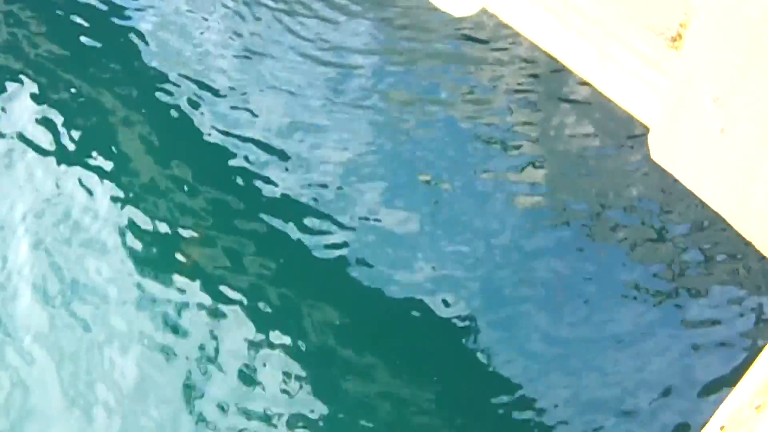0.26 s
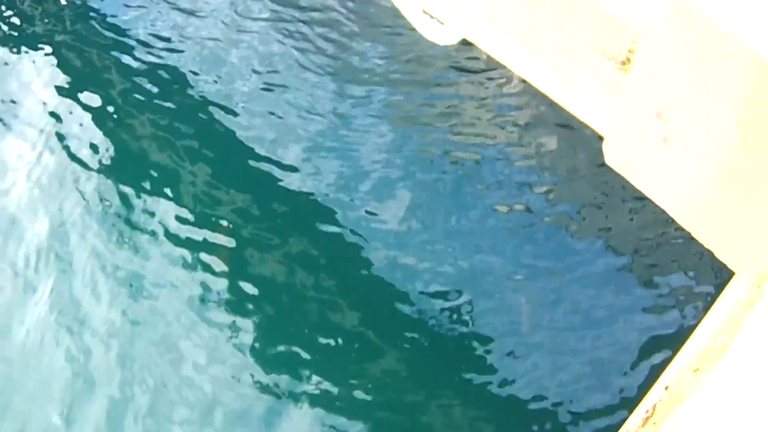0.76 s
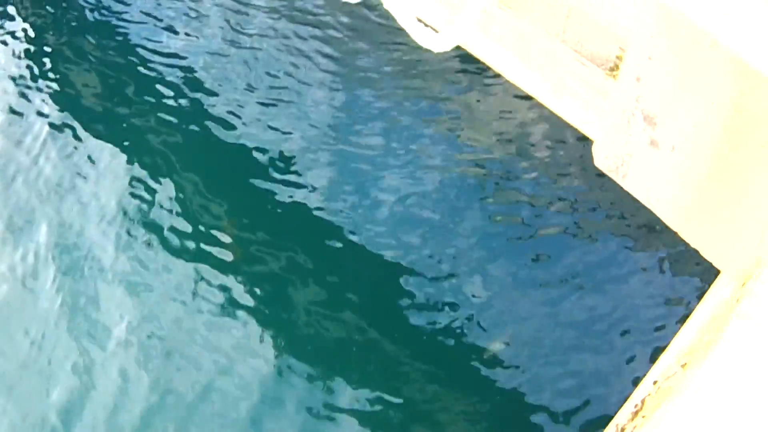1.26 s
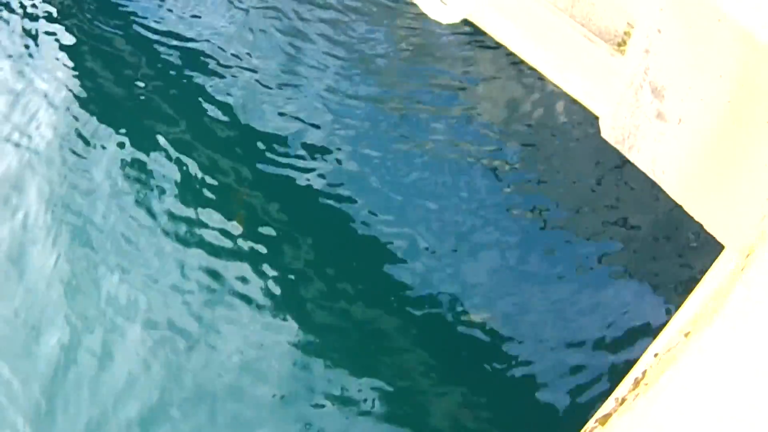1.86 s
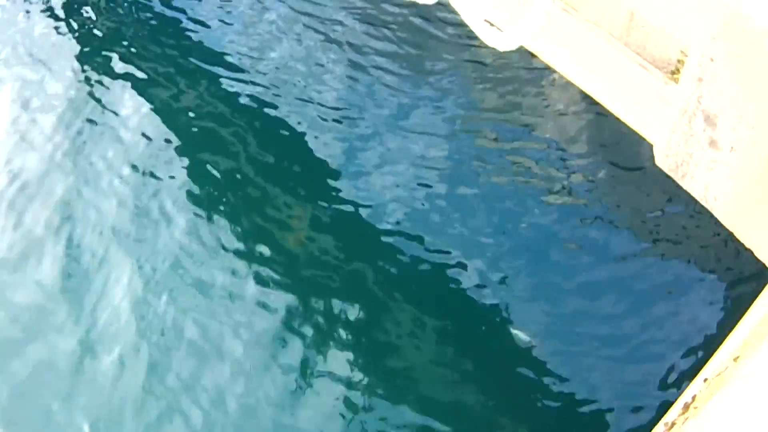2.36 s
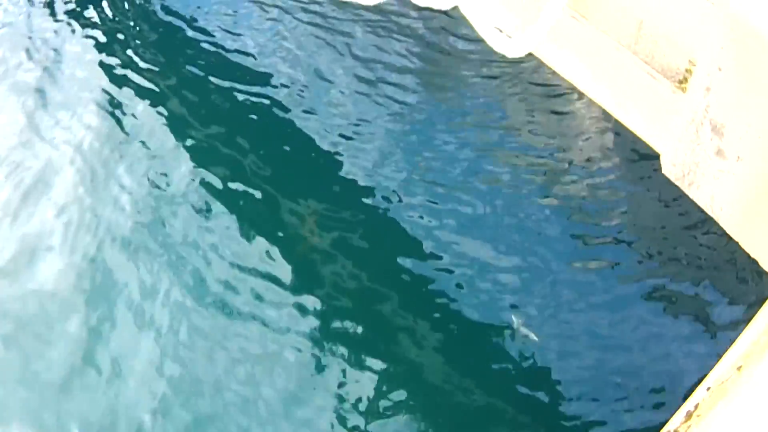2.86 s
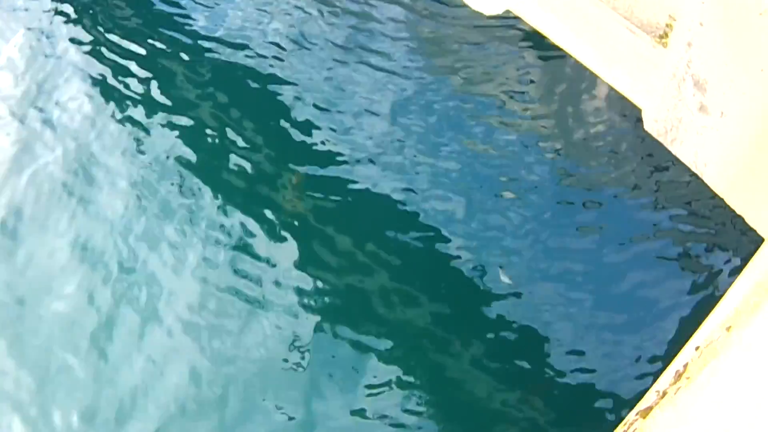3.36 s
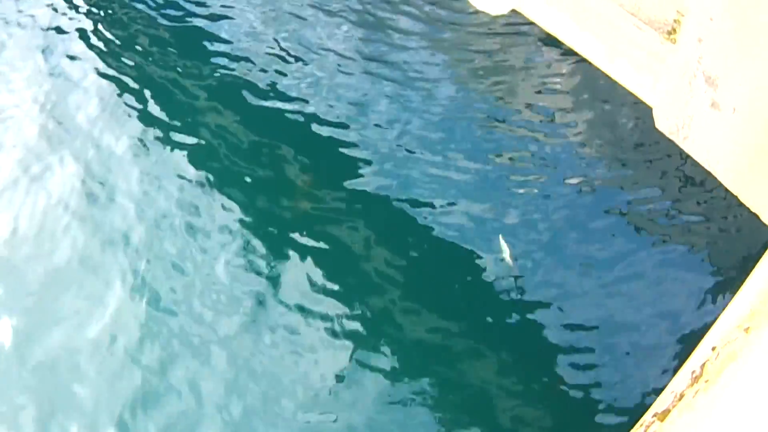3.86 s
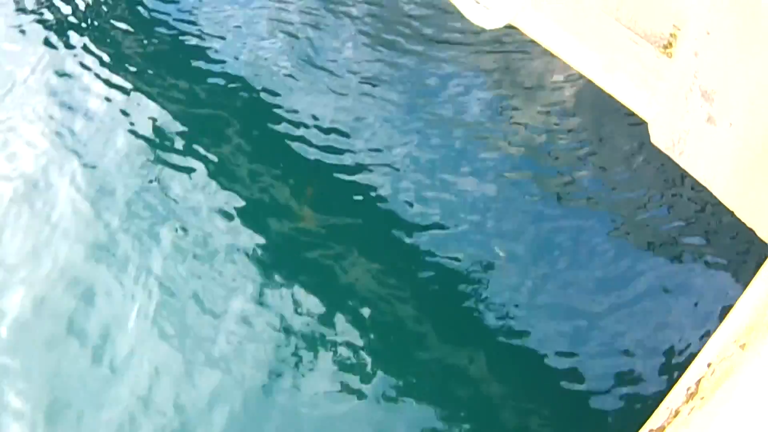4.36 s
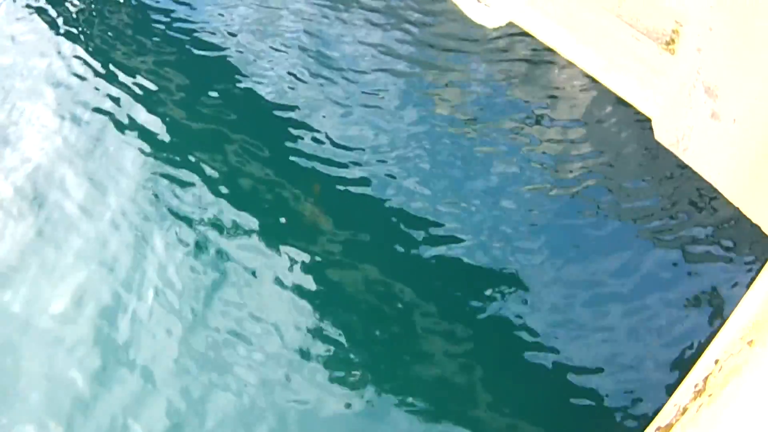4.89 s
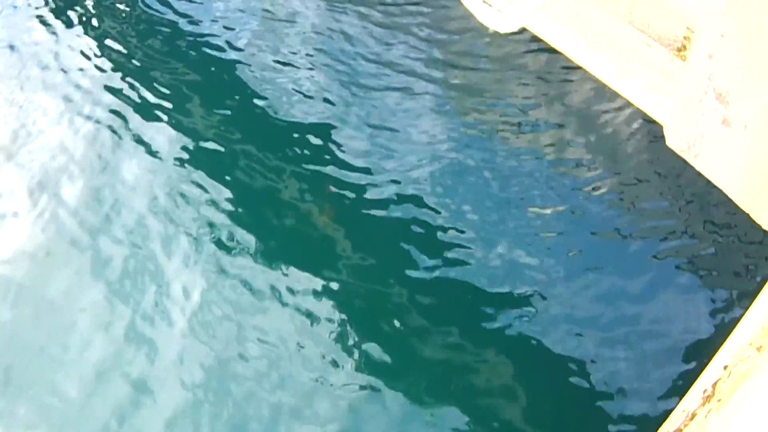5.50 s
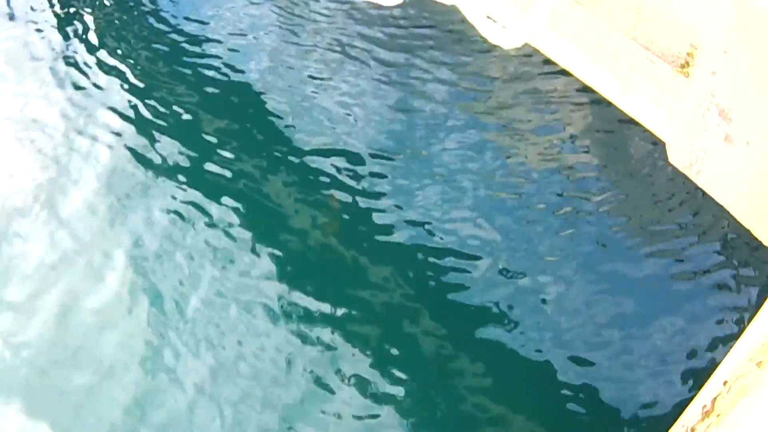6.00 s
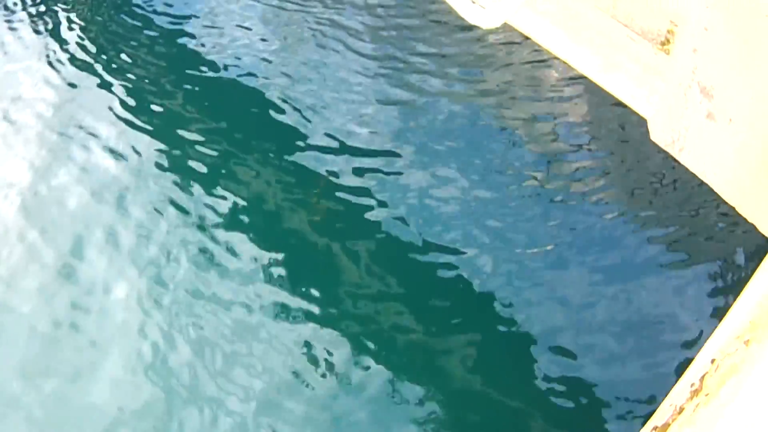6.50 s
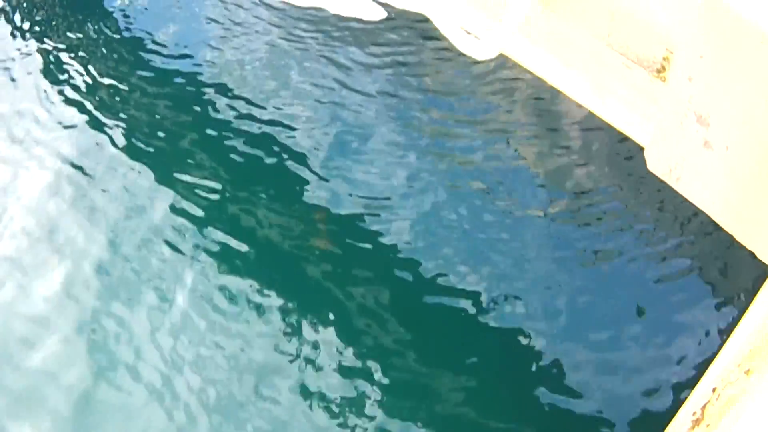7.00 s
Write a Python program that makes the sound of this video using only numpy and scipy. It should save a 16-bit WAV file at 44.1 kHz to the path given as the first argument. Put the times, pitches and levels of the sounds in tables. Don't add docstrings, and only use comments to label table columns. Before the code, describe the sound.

Harbour water rushes and fizzes along a pier wall over the low, slowly beating rumble of two idling boat diesels, with small drops clicking.

```python
import sys
import numpy as np
from scipy import signal
from scipy.fft import rfft, irfft, next_fast_len
from scipy.io import wavfile
from scipy.ndimage import uniform_filter1d, minimum_filter1d, map_coordinates

SR = 44100
rng = np.random.default_rng(int(sys.argv[2]) if len(sys.argv) > 2 else 0)


def gain_from_db(level_db):
    decades = np.asarray(level_db, float) / 20
    return 10 ** decades


def wrap_up_sound(samples):
    columns = np.atleast_2d(samples).T
    tamed = np.clip(columns, -1, 1)
    steps = np.round(tamed * 32767).astype(np.int16)
    wavfile.write(sys.argv[1], SR, steps)


N = 319435


def unit(x):
    return x / np.sqrt(np.mean(x ** 2) + 1e-20)


def along(points, hz):
    f, *columns = np.transpose(points)
    return np.array([np.interp(np.log(hz + 1), np.log(f + 1), column) for column in columns])


def wobble(rate, size=N, per_second=SR):
    knots = rng.standard_normal(int(size * rate / per_second) + 4)
    return map_coordinates(knots, [np.arange(size) * rate / per_second])


def swells(events):
    t = np.arange(N) / SR
    return sum(height * np.exp(-((t - at) / span) ** 2) for at, height, span in events)


def filtered(x, response):
    m = next_fast_len(N + 8192)
    return irfft(rfft(x, m) * response(np.fft.rfftfreq(m, 1 / SR)), m)[..., :N]


def coloured(x, spectrum):
    return unit(filtered(x, lambda hz: gain_from_db(along(spectrum, hz)[0])))


def resonant(x, modes):
    def response(f):
        total = 0
        for k, (centre, width, db) in enumerate(modes):
            total = total + (-1) ** k * gain_from_db(db) * 1j * f * width / (centre * centre - f * f + 1j * f * width)
        return total
    return filtered(x, response)


def patchy(patchy_db):
    z = signal.stft(rng.standard_normal(N), nperseg=512)[2]
    field = uniform_filter1d(rng.standard_normal(z.shape), size=9, axis=0)
    field = uniform_filter1d(field, size=8, axis=1)
    return unit(signal.istft(z * gain_from_db(patchy_db * unit(field)), nperseg=512)[1][:N])


def crackle(rate, spread_db):
    sizes = gain_from_db(spread_db * np.minimum(rng.exponential(size=N), 4)) * rng.standard_normal(N)
    return unit(sizes * (rng.random(N) < rate / SR))


def bubble(hz, db, t60):
    t = np.arange(SR // 20) / SR
    return gain_from_db(db - 60 * t / t60) * np.sin(2 * np.pi * hz * t * (1 + 4 * t))


def engine(cycle_hz, orders, lead, lag, hunting):
    step = 30
    count, slow = N // step + 1, SR / step
    turns = cycle_hz * np.arange(count) / slow + lead + hunting * wobble(0.622, count, slow)
    luck = 0.15 * rng.standard_normal(len(orders))
    tones = np.zeros(count)
    for (k, db), shift in zip(orders, luck):
        level = np.sqrt(2) * gain_from_db(db + 1.14 * wobble(2.7, count, slow))
        tones += level * np.cos(2 * np.pi * (k * (turns - lag * k) + shift))
    return signal.resample_poly(tones, step, 1)[:N]


# multiple of the firing cycle, rms level in dB.
NEAR_TONES = [(4, -58), (5, -71), (6, -65), (7, -56), (8, -68), (9, -52), (11, -59), (12, -66), (14, -61),
              (15, -65), (16, -57), (20, -67), (22, -64), (23, -64), (24, -62), (25, -62), (26, -67),
              (27, -57), (28, -57), (29, -64), (32, -66), (34, -69), (36, -66), (37, -60), (38, -67),
              (39, -63), (40, -69), (57, -63), (60, -69), (70, -70)]


def near_boat():
    return engine(4.628, NEAR_TONES, lead=.65, lag=.0037, hunting=.002)


# multiple of the firing cycle, rms level in dB.
FAR_TONES = [(5, -74), (6, -70), (7, -74), (8, -60), (10, -69), (12, -61), (14, -71), (16, -59), (18, -63),
             (21, -68), (24, -64), (32, -67), (43, -70), (46, -70), (63, -71), (69, -72)]


def far_boat():
    return engine(4.691, FAR_TONES, lead=.3, lag=.004, hunting=0.0027)


# pitch in Hz, level in dB per Hz.
WASH_COLOUR = [(12, -9), (25, -8), (45, -2), (70, -3), (120, 1), (160, -0.5), (190, -4.5), (208, 0),
               (250, -9), (300, -4.5), (350, -8), (420, -16.5), (700, -28), (1500, -120)]


def wash():
    return gain_from_db(-47.0 + 0.15 * wobble(2.4)) * coloured(patchy(patchy_db=0.0), WASH_COLOUR)


# time in seconds, rise in dB (negative: dip, 0: no change), length in seconds.
SPLASH_TIMES = [(0.423, 2.5, .04), (0.748, 0, 0.0048), (1.003, 0, 0.046), (1.245, 2, 0.032),
                (2.9, 0.5, 0.05), (3.474, 1, .04), (3.72, 0, 0.088), (4.17, -1, 0.041), (4.49, 1.5, .03),
                (4.572, -1, 0.037), (5.68, 1.5, 0.034), (5.81, -0.5, .04), (5.935, 1.5, 0.045),
                (6.02, -0.5, 0.018), (6.07, 1.5, 0.047), (6.194, 2, 0.027), (6.407, 2.5, 0.037),
                (6.624, 2.5, 0.031), (6.693, -1.5, .03), (6.826, 1, .04), (6.94, 1.5, 0.025)]


def splashes():
    flutter = 0.18 * wobble(7.2) + 0.25 * wobble(17) + 0.54 * wobble(42)
    return swells(SPLASH_TIMES) + flutter


# pitch in Hz, level in dB per Hz.
BODY_COLOUR = [(220, -28), (380, -4.5), (409, -5.5), (456, 0.5), (494, -1), (569, 1.5), (674, -2),
               (720, -5), (792, -3), (1210, -4), (1320, -4), (1660, -8), (1900, -11.5), (2470, -62),
               (4180, -120)]
# time in seconds, rise in dB, length in seconds.
WAVES = [
    (.1, 0.9, 1),
    (1.288, 2, 0.18),
    (2.942, 1.5, 0.19),
    (5.0, -0.4, .3),
    (6.33, 0.5, 0.15),
    (7.24, 1, 0.27),
]


def water_body(flow_db, splash_db):
    noise = patchy(patchy_db=0.5) + 0.22 * crackle(300, spread_db=0.0)
    follow_db = 0.17 * (flow_db - flow_db.mean())
    return gain_from_db(-51 + follow_db + swells(WAVES) + 0.19 * splash_db) * coloured(noise, BODY_COLOUR)


# pitch in Hz, level in dB per Hz.
SPRAY_COLOUR = [(1120, -33), (1900, -6.5), (3840, -4), (6060, 0), (8210, -11.5), (10100, -22.5),
                (13400, -35)]


def spray_and_mist(flow_db, mist_db, splash_db):
    fizz = coloured(patchy(patchy_db=0.8) + 0.44 * crackle(1300, spread_db=3.0), SPRAY_COLOUR)
    mist = filtered(fizz, lambda hz: 1 / (1 + (8000 / (hz + 1)) ** 12) / np.sqrt(1 + (hz / 12000) ** 6))
    spray = gain_from_db(flow_db - 0.56 + splash_db) * unit(fizz - mist)
    return spray + gain_from_db(flow_db - 18 + mist_db + splash_db) * unit(mist)


# time in seconds, strength in dB, extra level of the mist in dB.
WATER_FLOW = [
    (0, -46, -1),
    (1.29, -46, -0.5),
    (2.1, -46.5, .3),
    (2.66, -46, 2),
    (2.94, -44.5, -2.5),
    (3.3, -46, 0.5),
    (3.83, -44.5, -0.5),
    (4.27, -46, 2),
    (5.0, -45, 1.5),
    (5.5, -45.5, 1.5),
    (5.95, -45.5, -2),
    (6.33, -46.5, 5.5),
    (6.73, -46, 2.5),
    (7.24, -47, 3.5),
]


def water():
    t = np.arange(N) / SR
    s, *columns = np.transpose(WATER_FLOW)
    flow_db, mist_db = [np.interp(t, s, column) for column in columns]
    splash_db = splashes()
    return water_body(flow_db, splash_db) + spray_and_mist(flow_db, mist_db, splash_db)


# time in seconds, peak level in dB, length in seconds.
WIND_PUFFS = [
    (.8, -74, 1.8),
    (3.1, -74, 0.72),
    (5.9, -71, 0.16),
]
# pitch in Hz, level in dB per Hz.
BREEZE_COLOUR = [(9000, -60), (11500, -2), (14000, -2), (16500, -18)]


def breeze():
    t = np.arange(N) / SR
    level = sum(gain_from_db(db) * np.exp(-((t - at) / span) ** 2) for at, db, span in WIND_PUFFS)
    return level * coloured(patchy(patchy_db=1.5), BREEZE_COLOUR)


def ambience():
    return wash() + water() + breeze()


def rings(events):
    out = np.zeros(N + SR)
    for s, db, hz, t60 in events:
        out[round(s * SR):][:SR // 20] += bubble(hz, db, t60)
    return out[:N]


# time in seconds, peak level in dB, pitch in Hz.
SPRAY_TICKS = [(.1012, -35, 6030), (0.126, -34, 2600), (.345, -31, 4600), (.998, -35, 6100),
               (1.976, -39, 7000), (1.3902, -32, 4950), (1.982, -31, 5000), (1.989, -31, 4800),
               (1.998, -37, 4100), (2.006, -39, 3600), (2.145, -42, 5900), (3.4605, -46, 9000),
               (4.0577, -44, 9000), (6.1579, -47, 9000), (.5427, -47, 7860), (.6579, -41, 7450),
               (.416, -42, 7400), (1.366, -36, 7450), (1.2795, -39, 7000), (1.7215, -40, 7230),
               (3.6731, -40, 7100), (3.7978, -38, 7270), (4.9057, -42, 7470), (5.1248, -41, 7080),
               (6.4847, -40, 7330), (7.1092, -42, 8020), (2.6878, -37, 5600), (3.0934, -34, 5930),
               (4.4516, -34, 6010), (5.0983, -33, 5570), (5.3915, -34, 6020), (5.682, -28, 5940),
               (5.8265, -33, 5680), (5.8855, -31, 5700), (6.7236, -35, 5190), (6.763, -33, 5410),
               (6.9267, -41, 5570), (6.9521, -37, 7600)]


def ticks():
    return rings([(s, db, hz, .006) for s, db, hz in SPRAY_TICKS])


# time in seconds, peak level in dB, bubble pitch in Hz,
# bubble level and snap level in dB over the peak.
DROP_HITS = [(0.3819, -38, 2060, -3.5, -26), (0.7388, -49, 3540, -18, -24), (0.8545, -47, 2700, 4, -20),
             (0.8697, -46, 1890, 7, -25), (0.999, -39, 1400, -22, -34), (1.258, -47.5, 1790, -9, -25),
             (2.2425, -37, 1550, 0, 2), (2.6238, -46, 3410, -16, -33), (2.6935, -36, 2280, -8, -1),
             (3.652, -37, 1430, -10, -33), (3.9294, -51, 2140, -12, -24), (3.9547, -43, 2700, -3, -24),
             (4.176, -40, 2520, -23, -32), (4.7031, -36.5, 2410, -11, -34), (5.1713, -37, 2720, -25, -33),
             (5.2128, -37, 1670, -19, -18), (5.922, -45.5, 2970, 4.5, 5), (6.0435, -40, 2290, -20, -22),
             (6.312, -40, 3570, -14, -30), (6.3838, -42, 2620, -20, -24), (6.406, -51, 2700, -26, -26)]
# pitch in Hz, width in Hz, level in dB.
MICROPHONE_RING = [(2920, 4800, -2), (6250, 1080, 7.5)]
# pitch in Hz, width in Hz, level in dB.
SNAP_RING = [(10800, 7400, -13)]


def drops():
    bubbles, cracks, snaps = np.zeros((3, N + SR))
    t = np.arange(SR // 20) / SR
    for s, db, hz, bubble_db, snap_db in DROP_HITS:
        at = round(s * SR) + 60
        rebound = rng.standard_normal(len(t)) * (rng.random(len(t)) < .15)
        burst = (t == 0) + 0.44 * gain_from_db(-60 * t / 0.0044) * rebound
        bubbles[at:][:len(t)] -= bubble(hz, db + bubble_db + 10.0, t60=0.0084)
        cracks[at + 6:][:len(t)] += gain_from_db(db + 22.5) * burst
        snaps[at:][:len(t)] -= gain_from_db(db + snap_db - 2) * burst
    bright = resonant(resonant(snaps[:N], SNAP_RING), SNAP_RING)
    return bubbles[:N] + resonant(cracks[:N], MICROPHONE_RING) + bright


# time in seconds, peak level in dB, pitch
# in Hz, # time to fade by 60 dB in seconds.
PLOP_BUBBLES = [(.3836, -31, 2140, .013), (.3835, -25, 3730, .008), (.3838, -33, 2500, .005),
                (.3836, -38, 1400, .007), (.3831, -28, 6300, .003), (.3865, -39, 2100, .01),
                (.3832, -52, 13300, .003), (.7402, -30, 3500, .011), (.7401, -27, 6500, .004),
                (.7408, -35, 7900, .005), (.8552, -33, 4100, .004), (.8556, -35, 3400, .004),
                (.8703, -32, 3400, .005), (.8711, -27, 2400, .005), (1.289, -39, 2700, .012),
                (1.377, -44, 3100, .015), (2.2439, -34, 1200, .0046), (2.2451, -31, 2300, .008),
                (2.2442, -28, 2100, .003), (2.2443, -22, 4600, .004), (2.2443, -30, 3400, .003),
                (2.2455, -33, 5500, .008), (2.2443, -17, 6300, .0045), (2.2443, -26, 8100, .003),
                (2.2441, -33, 10500, .002), (2.2444, -42, 15500, .005), (2.2455, -37, 3500, .005),
                (2.625, -33, 5900, .008), (2.6248, -36, 4900, .004), (2.6945, -33, 2500, .007),
                (3.9297, -40, 2160, .025), (5.8857, -34, 6600, .003), (5.9228, -33, 2300, .005),
                (5.9235, -38, 3600, .005), (6.3845, -31, 2650, .011), (6.392, -42, 2600, .012),
                (6.395, -40, 2750, .012), (6.4075, -31, 2680, .012), (6.422, -42, 2850, .025)]


def plops():
    return rings(PLOP_BUBBLES)


def trickle():
    start, end = 1.1, 1.42
    return rings([(start + when * (end - start), -51 + 6 * size, 2730 * (.8 + 0.39 * tune), 0.018)
                  for when, tune, size in rng.random((22, 3))])


def scene():
    boats = near_boat() + far_boat()
    return np.array([boats + ambience() + ticks() + drops() + plops() + trickle(), ambience()])


# pitch in Hz, right minus left in dB, phase of the right in radians,
# likeness of the two from 0 to 1.
PAIR = [(20, 5.0, -0.14, 0.935), (45, 4.2, -0.25, 0.99), (100, 3.0, -0.54, 0.991), (180, 0.9, -0.77, 0.993),
        (290, -3.0, -0.93, 0.984), (420, -7.0, -0.79, 0.955), (600, -9.0, -0.37, 0.944),
        (800, -8.1, -0.07, 0.948), (1200, -7.1, 0.01, 0.969), (2000, -6.0, 0.02, 0.934),
        (4000, -5.6, 0.01, 0.976), (7000, -5.5, 0.01, 0.981), (9500, -2.3, 0.01, 0.92),
        (13000, -1.2, 0.03, 0.35)]


def microphone_pair(hz):
    tilt_db, turn, alike = along(PAIR, hz)
    ratio = gain_from_db(tilt_db) * np.exp(1j * turn)
    apart = np.sqrt((1 - np.clip(alike, 0, 1)) / (1 + alike))
    return 2 / (1 + ratio) * np.array([[1 + 0 * ratio, apart], [ratio, -apart * ratio]])


# start in seconds, highest pitch kept in Hz, Hz lost now and
TOP_STAGES = [
    (0, 15000, 0),
    (2.28, 14280, 0),
    (4.7, 14280, 750),
    (6.07, 13530, -650),
]


def band_limit(x):
    hz, t, z = signal.stft(x, SR, nperseg=1024)
    stages = np.transpose(TOP_STAGES)
    _, top_hz, flicker_hz = stages[:, np.searchsorted(stages[0], t, side="right") - 1]
    treble_db = 10 * np.log10(np.mean(abs(z[0, hz > 11000]) ** 2, axis=0) + 1e-20)
    jump_db = -minimum_filter1d(np.median(treble_db) - treble_db, size=3)
    top_hz = top_hz - flicker_hz * (wobble(12, len(t), 1 / t[1]) > .6)
    top_hz = top_hz + 150 * np.maximum(jump_db - 6, 0)
    return signal.istft(z * (hz[:, None] < top_hz), SR, nperseg=1024)[1][:, :N]


def top_cut(x):
    return signal.sosfilt(signal.butter(12, 16330, fs=SR, output="sos"), x)


STEADY_OFFSET = [
    [.0037],
    [.0707],
]


def record(dry):
    heard = filtered(dry, microphone_pair).sum(axis=1)
    mix = band_limit(heard) + STEADY_OFFSET
    return top_cut(mix)


dry = scene()
out = record(dry)
wrap_up_sound(out)
```